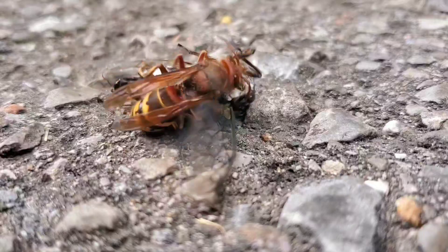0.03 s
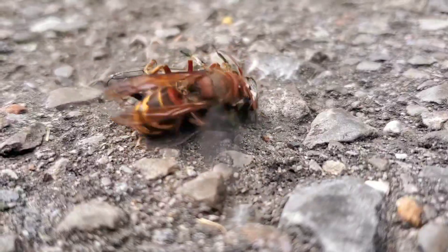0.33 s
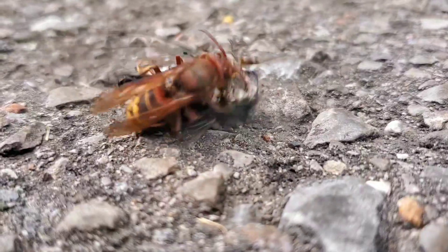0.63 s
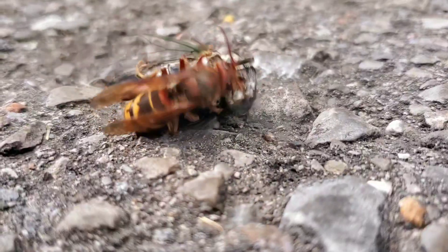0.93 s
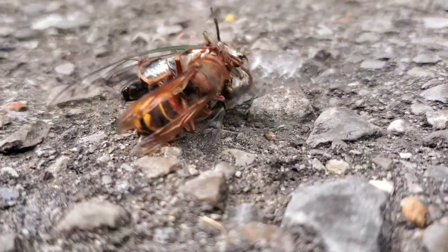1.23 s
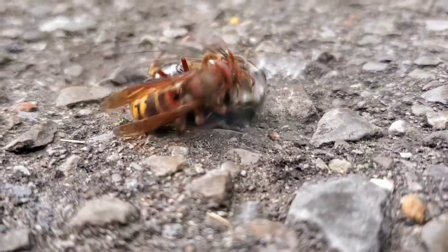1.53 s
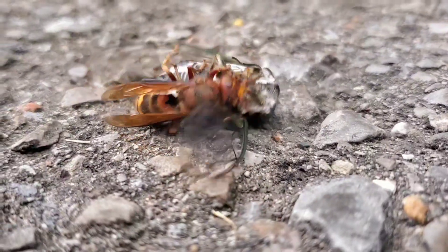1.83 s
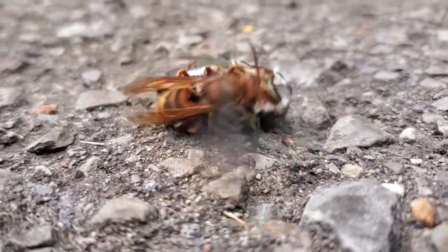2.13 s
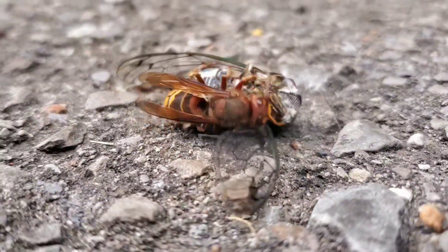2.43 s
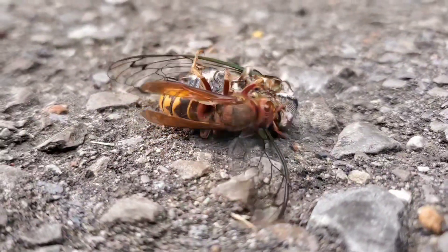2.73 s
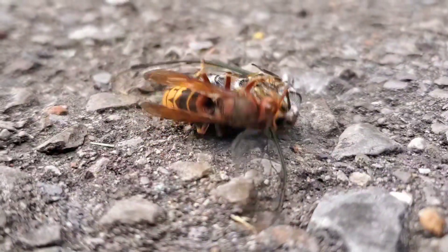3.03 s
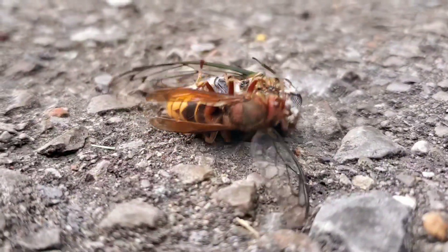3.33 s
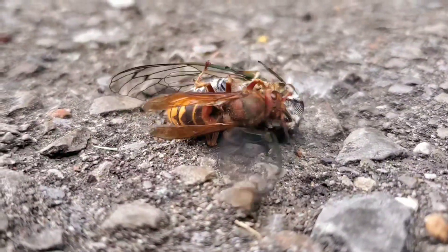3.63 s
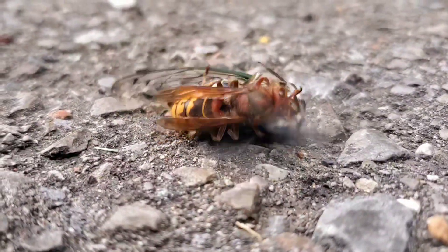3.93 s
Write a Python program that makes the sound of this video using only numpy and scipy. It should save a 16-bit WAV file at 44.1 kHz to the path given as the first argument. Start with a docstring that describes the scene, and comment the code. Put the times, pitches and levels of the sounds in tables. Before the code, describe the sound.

Close to the microphone, brittle insect wings crack and rustle on stones while a hornet grapples with its prey, busiest early and then a little sparser. Tiny claws tick over soft outdoor air and a faint, far engine hum.

```python
"""Dry wings and shell snap against stones, a hand's width from the microphone: a hornet is wrestling
with a large winged insect on rough gravel. Each snap is one hard crack with a faint crackle. Between
them wings scrape and claws tick, both made of many tiny contacts. Far behind lie a low outdoor rumble
with a faint hum, as of a distant engine, and a soft hiss of air."""
import sys
import numpy as np
from scipy.fft import rfft, irfft, next_fast_len
from scipy.io import wavfile
from scipy.ndimage import map_coordinates

SR = 44100
rng = np.random.default_rng(int(sys.argv[2]) if len(sys.argv) > 2 else 0)


def output_pcm(signal):
    """Save a mono or channel-first signal as 16-bit PCM at the path in sys.argv[1].

    Samples are clipped to [-1, 1] before scaling.
    """
    pcm = np.clip(np.atleast_2d(signal).T, -1, 1) * 32767
    wavfile.write(sys.argv[1], SR, np.round(pcm).astype(np.int16))


N = 176400
CONTACT_SAMPLES, LEAD_S = 8192, .06  # length of one contact, and the time before its peak
TOP_HZ = 16400


def amp(db):
    """Decibels to gain."""
    return 10 ** (np.asarray(db) / 20)


def unit(x):
    """Scaled to rms 1."""
    return x / np.sqrt(np.mean(x ** 2) + 1e-20)


def along(points, hz):
    """Interpolate (Hz, value) points on a log frequency axis."""
    knot_hz, values = np.transpose(points)
    return np.interp(np.log(hz + 1), np.log(knot_hz + 1), values)


def wobble(rate, size=N):
    """A smooth random curve, rate knots a second."""
    knots = rng.standard_normal(int(size * rate / SR) + 4)
    return map_coordinates(knots, [np.arange(size) * rate / SR])


def filtered(x, gain):
    """x through a minimum-phase filter with the given gain over frequency."""
    n = x.shape[-1]
    half = next_fast_len(n)
    m = 2 * half
    cepstrum = irfft(np.log(np.maximum(gain(np.fft.rfftfreq(m, 1 / SR)), 1e-6)), m)
    cepstrum[..., 1:half] *= 2
    cepstrum[..., half:] = 0
    return irfft(rfft(x, m) * np.exp(rfft(cepstrum)), m)[..., :n]


def pan(db):
    """Left and right gains, db up and db down."""
    return amp(np.array([[1], [-1]]) * db)


def add(out, x, s):
    """Mix x into out from time s on."""
    start = round(s * SR)
    out[:, max(start, 0):start + x.shape[-1]] += x[:, max(-start, 0):N - start]


def wash(spectrum, alike):
    """Stereo noise of rms 1 whose channels are partly alike."""
    mid, side = filtered(rng.standard_normal((2, N)), lambda hz: amp(along(spectrum, hz)))
    turn = np.arccos(alike) / 2
    return unit(np.cos(turn) * mid + np.sin(turn) * np.array([side, -side]))


def swell(rise_s, fall_s):
    """Envelope of a contact, peaking LEAD_S after its start."""
    t = np.arange(CONTACT_SAMPLES) / SR - LEAD_S
    return np.exp(np.minimum(t / rise_s, -t / fall_s))


def crackle(rise_s, fall_s, grains_per_s=7000, spread_db=16, clumps_per_s=350, clump_db=3.5):
    """A swell of tiny contacts that come in clumps as the wing catches and slips."""
    n = CONTACT_SAMPLES
    clumps = unit(amp(clump_db * wobble(clumps_per_s, n)))
    hits = (rng.random(n) < grains_per_s / SR) * amp(rng.uniform(-spread_db, spread_db, n))
    polarity = np.sign(rng.standard_normal(n))
    grains = unit(hits * (polarity + .5 * rng.standard_normal((2, n))))  # each has its own place
    return swell(rise_s, fall_s) * clumps * grains


def shell(x, full_db, full_below_hz=8500, ripple_db=2.8, ripple_hz=2300, right_lag_s=.00022):
    """A contact takes the colour of the spot struck and reaches the microphone's left port first."""
    # A contact's colour at the left and the right port. Each row: frequency in Hz, relative gain in dB.
    left_colour = [(500, -1), (1900, 1), (4800, -1), (6400, 1.5), (7700, -3), (11300, 1), (14800, 8)]
    right_colour = [(1500, -6.5), (5500, -15), (9200, -4), (11200, 0), (12700, 3.5), (15500, 1.5)]
    knots = rng.standard_normal(100)

    def gain(hz):
        """Colour of this contact in both channels, with mean power 1."""
        ports_db = np.array([along(left_colour, hz), along(right_colour, hz)])
        spot_db = ripple_db * map_coordinates(knots, [hz / ripple_hz])
        shelf_db = full_db / (1 + (hz / full_below_hz) ** 10)
        return unit(amp(ports_db + spot_db + shelf_db) / (1 + (hz / TOP_HZ) ** 60))
    left, right = filtered(x, gain)
    return np.array([left, np.roll(right, round(right_lag_s * SR))])


def air():
    """A soft, wide hiss of open air, a little to the left."""
    # Spectrum of the hiss. Each row: frequency in Hz, relative density in dB.
    spectrum = [(900, 5), (2150, -5), (2480, -4), (2850, -4), (7800, -23), (15000, -26)]
    return amp(-44.5) * wash(spectrum, alike=.057) * pan(2.5)


def hum(waver_db=3, drift_rad=.41):
    """Two low tones, as of a far engine, wavering in level and phase."""
    # Tones of the hum. Each row: frequency in Hz, level in dB.
    tones = [(118.4, -38.5), (177.6, -42)]
    t = np.arange(N) / SR
    out = np.zeros(N)
    for hz, db in tones:
        waver = amp(waver_db * wobble(7))
        phase = 2 * np.pi * hz * t + drift_rad * wobble(6.03)
        out += amp(db) * unit(waver * np.sin(phase))
    return out


def distance():
    """The far rumble and the hum, near the centre, swelling together twice in the breeze."""
    # Spectrum of the rumble. Each row: frequency in Hz, relative density in dB.
    spectrum = [(28, -27), (62, 0.5), (125, -0.5), (148, -5), (195, -4.5), (250, -14.5), (400, -17),
                (1500, -59)]
    # Swells in the breeze. Each row: peak time in seconds, half length in seconds, rise in dB.
    swells = [(0.67, 0.11, 3.5), (1.528, 0.035, 5.5)]
    t = np.arange(N) / SR
    breeze_db = sum(db * np.exp(-np.square((t - s) / half)) for s, half, db in swells)
    low = hum() + amp(-31.5) * wash(spectrum, alike=.85)
    return low * amp(breeze_db) * pan(.75)


def claws(count=80):
    """Claws scratch the stones in faint ticks at random moments."""
    out = np.zeros((2, N))
    for s in rng.random(count) * N / SR:
        tick = shell(crackle(rise_s=.0015, fall_s=.003), full_db=3)
        add(out, amp(rng.normal(-43, 3.5)) * tick, s - LEAD_S)
    return out


def scrapes():
    """Each stroke of a wing over the stones is a quick swell of grains in a longer, softer rustle."""
    # Wing strokes on the gravel. Each row: peak time in seconds, relative level in dB.
    strokes = [(0.019, -34.5), (0.216, -38), (0.252, -34), (0.345, -41), (0.465, -38), (0.503, -33),
               (0.66, -34), (0.692, -45.5), (0.843, -32), (0.914, -35.5), (0.966, -32), (1.006, -40.5),
               (1.093, -31), (1.154, -39), (1.183, -39.5), (1.229, -41), (1.356, -37.5), (1.479, -39.5),
               (1.589, -42.5), (1.744, -36.5), (1.949, -35), (2.071, -44), (2.155, -40), (2.391, -33),
               (2.494, -34), (2.549, -35.5), (2.672, -37.5), (2.832, -35.5), (2.891, -36), (3.874, -40)]
    out = np.zeros((2, N))
    for s, db in strokes:
        scrape = crackle(rise_s=.0048, fall_s=.006)
        rustle = amp(-14) * crackle(rise_s=.015, fall_s=.03)
        add(out, amp(db + 4.5) * shell(scrape + rustle, full_db=3), s - LEAD_S)
    return out


def snaps():
    """Close to the microphone a wing gives way in one hard crack, then crackles faintly as it settles."""
    # Snaps of wing and shell. Each row: time in seconds, level in dB (energy spread over 2.5 ms),
    # fullness of the lower treble and below in dB.
    cracks = [(0.009, -21, -5), (0.214, -30, 2), (0.251, -31, 5), (0.256, -23, -2), (0.329, -34, 11),
              (0.343, -25, 3), (0.349, -29, -2), (0.373, -31, 2), (0.421, -31, 0), (0.457, -26, 7),
              (0.461, -24, 0), (0.496, -27, 7), (0.502, -24, 0), (0.533, -36, 6), (0.662, -28, 4),
              (0.798, -21, -1), (0.802, -22, -1), (0.842, -26, 4), (0.858, -33, 2), (0.868, -23, 1),
              (0.872, -25, 2), (0.899, -35, 6), (0.914, -29, 2), (0.961, -25, 4), (0.966, -23, -2),
              (0.998, -28, -2), (1.008, -30, 4), (1.036, -33, 5), (1.051, -24, 6), (1.055, -21, -3),
              (1.095, -25, 6), (1.128, -28, 4), (1.359, -30, 0), (1.394, -36, 4), (1.434, -29, -1),
              (1.563, -36, 4), (1.608, -30, 3), (1.659, -26, 1), (1.664, -25, -4), (1.743, -20, -6),
              (1.795, -27, -3), (1.872, -37, 0), (1.912, -25, -2), (1.917, -27, 2), (1.965, -29, -2),
              (1.969, -29, -4), (2.065, -24, -4), (2.073, -28, -2), (2.111, -21, -4), (2.116, -26, -1),
              (2.192, -25, -3), (2.25, -32, -4), (2.35, -29, 1), (2.352, -27, -3), (2.355, -22, -2),
              (2.497, -29, 8), (2.551, -29, 3), (2.689, -29, -1), (2.805, -39, -3), (2.85, -31, 0),
              (2.871, -24, -8), (2.904, -23, -4), (2.91, -33, 3), (3.01, -30, -1), (3.029, -37, -4),
              (3.095, -37, 1), (3.191, -31, 0), (3.383, -23, -7), (3.386, -28, 0), (3.493, -25, -5),
              (3.496, -29, -2), (3.575, -28, -2), (3.637, -40, 3), (3.684, -26, -1), (3.788, -29, -3),
              (3.796, -28, -4), (3.868, -25, -2), (3.879, -24, -2), (3.923, -30, 4), (3.928, -25, -1)]
    out = np.zeros((2, N))
    impulse = np.arange(CONTACT_SAMPLES) == round(LEAD_S * SR)
    energy_scale = np.sqrt(.0025 * SR / CONTACT_SAMPLES)
    for s, db, full_db in cracks:
        noise = (rng.standard_normal(CONTACT_SAMPLES) + rng.standard_normal((2, CONTACT_SAMPLES))) / 2
        burst = .7 * noise * swell(rise_s=.00022, fall_s=.0004)
        settling = .07 * crackle(rise_s=.002, fall_s=.004)
        snap = unit(shell(impulse + burst + settling, full_db))
        add(out, amp(db) * energy_scale * snap, s - LEAD_S)
    return out


def scene():
    """The struggle up close, the outdoors behind it."""
    return snaps() + scrapes() + claws() + distance() + air()


def record(dry):
    """The recorder keeps nothing above its band limit."""
    m = 2 * next_fast_len(N)
    hz = np.fft.rfftfreq(m, 1 / SR)
    return irfft(rfft(dry, m) / (1 + (hz / TOP_HZ) ** 120), m)[:, :N]


dry = scene()
out = record(dry)
output_pcm(out)
```